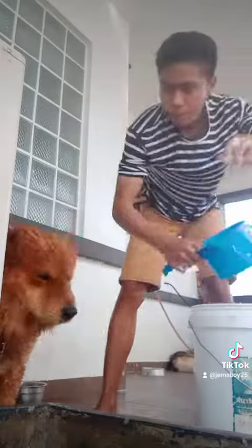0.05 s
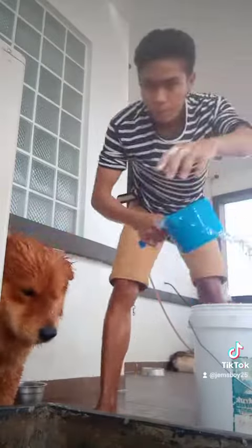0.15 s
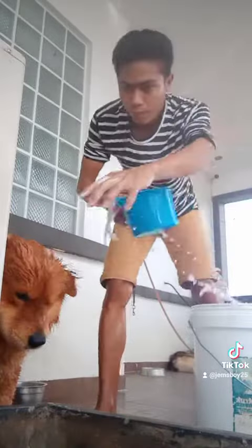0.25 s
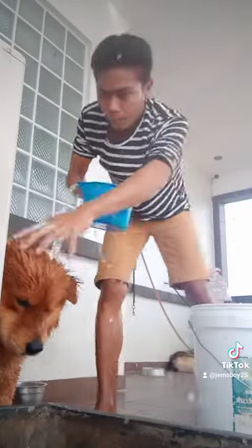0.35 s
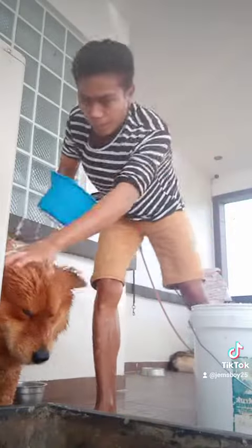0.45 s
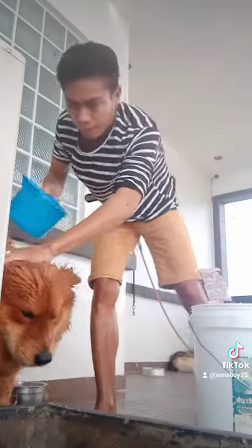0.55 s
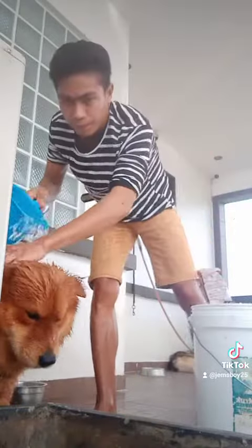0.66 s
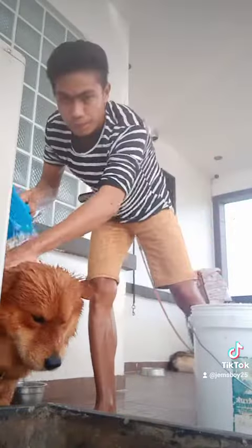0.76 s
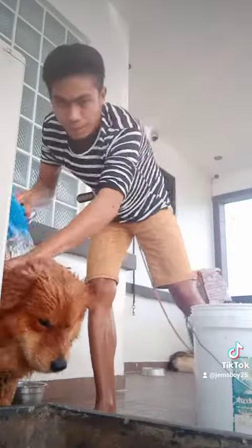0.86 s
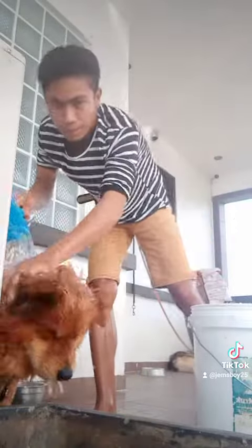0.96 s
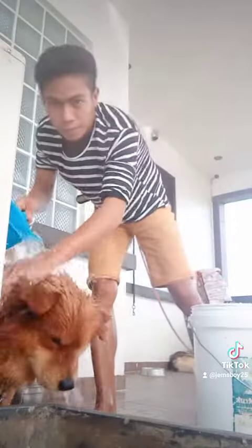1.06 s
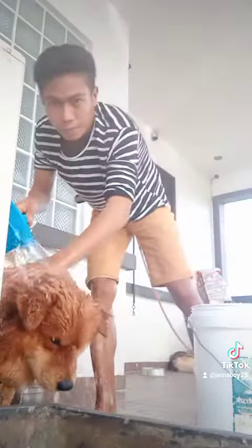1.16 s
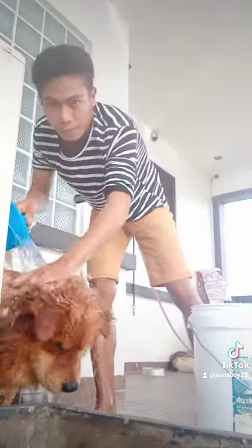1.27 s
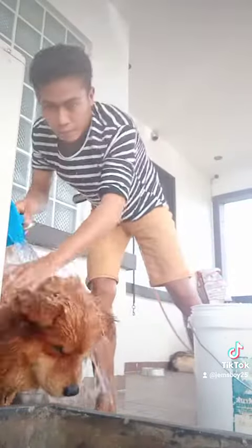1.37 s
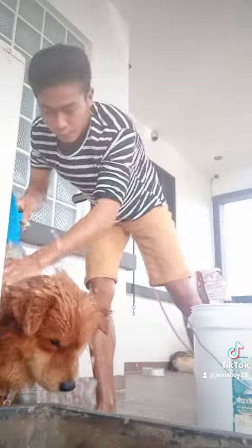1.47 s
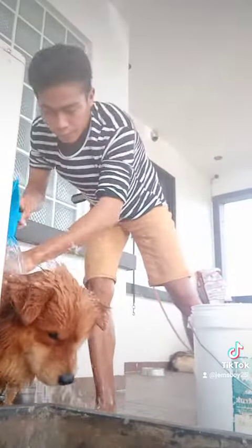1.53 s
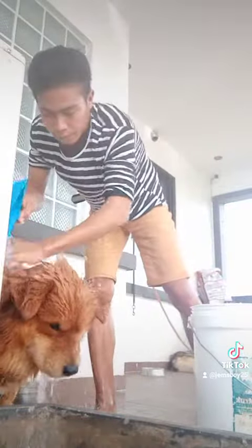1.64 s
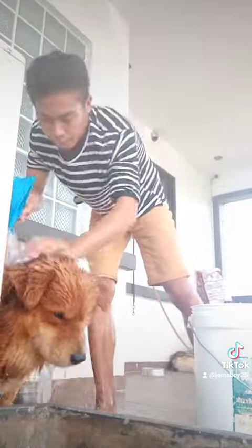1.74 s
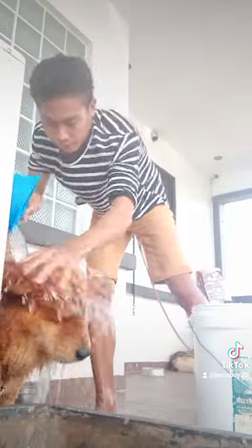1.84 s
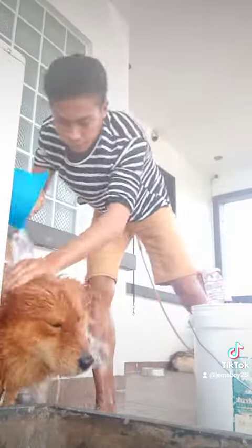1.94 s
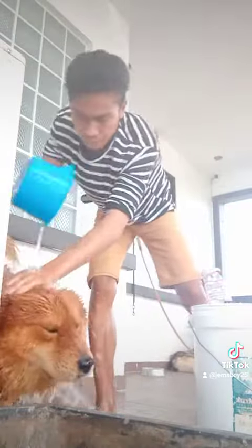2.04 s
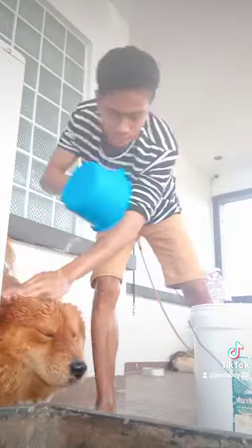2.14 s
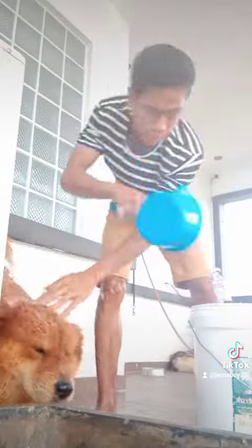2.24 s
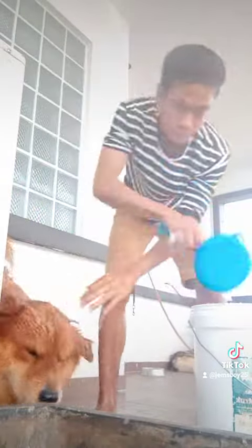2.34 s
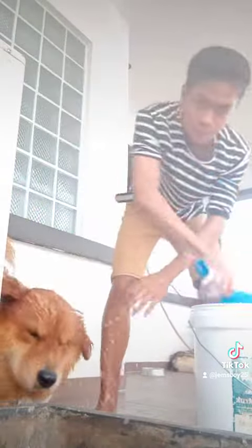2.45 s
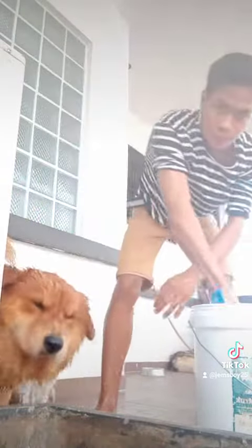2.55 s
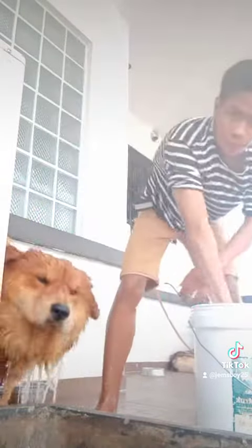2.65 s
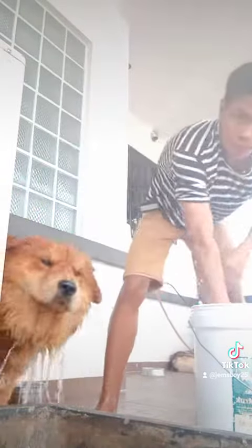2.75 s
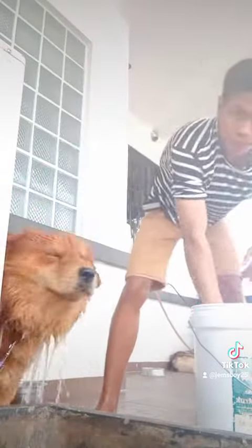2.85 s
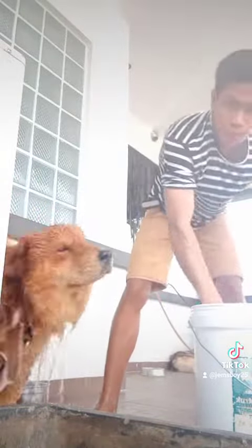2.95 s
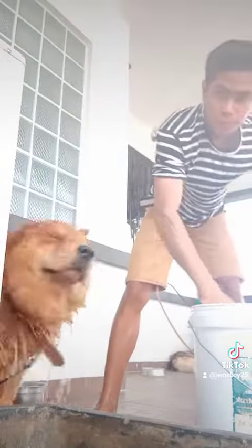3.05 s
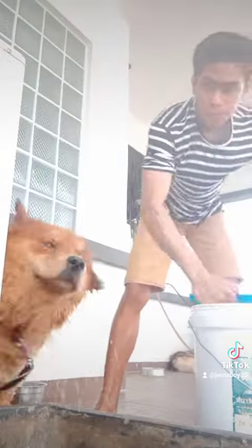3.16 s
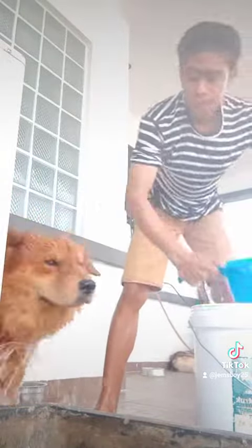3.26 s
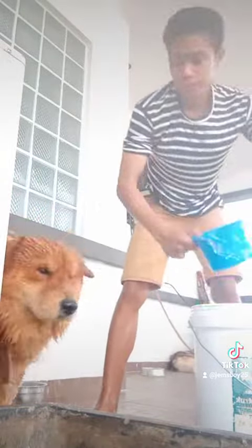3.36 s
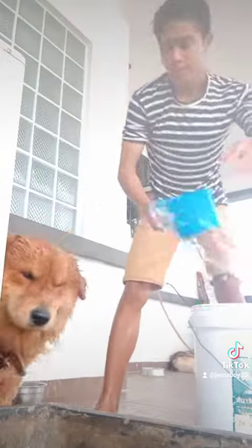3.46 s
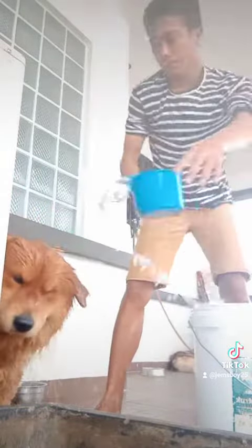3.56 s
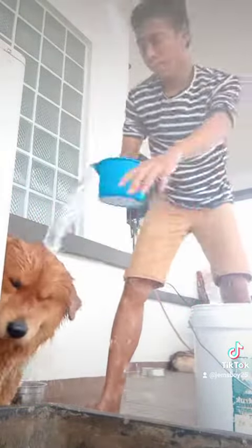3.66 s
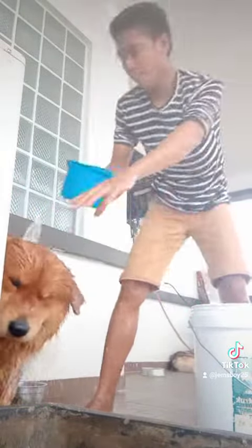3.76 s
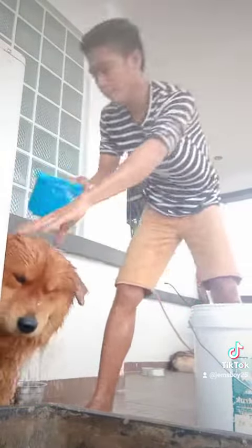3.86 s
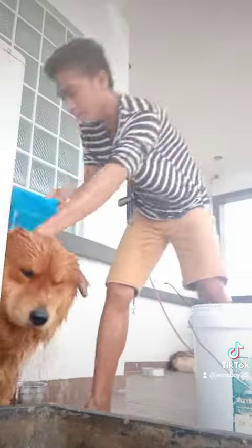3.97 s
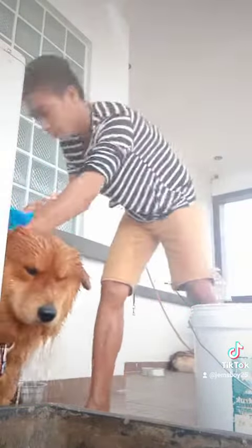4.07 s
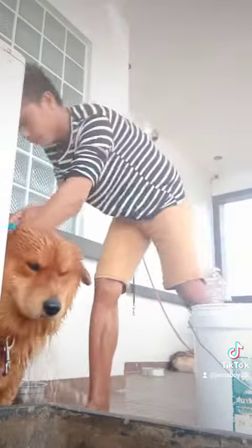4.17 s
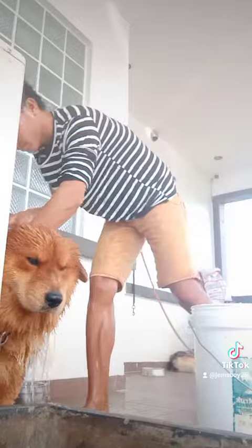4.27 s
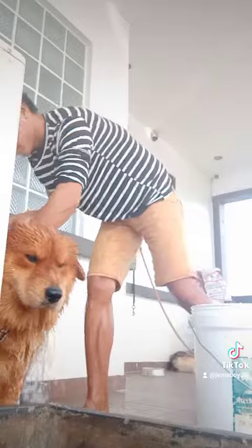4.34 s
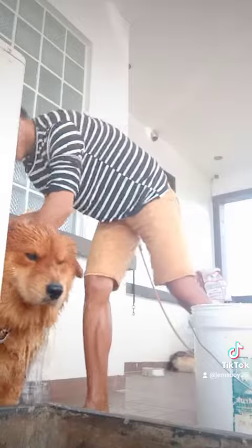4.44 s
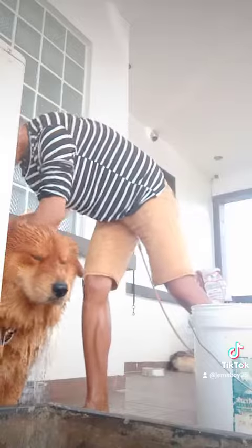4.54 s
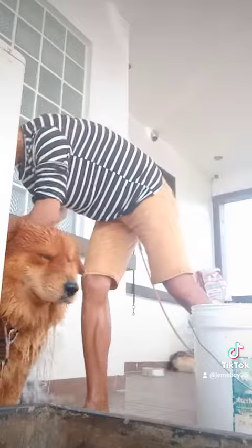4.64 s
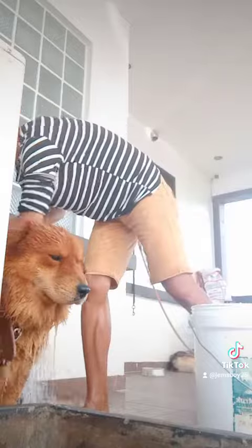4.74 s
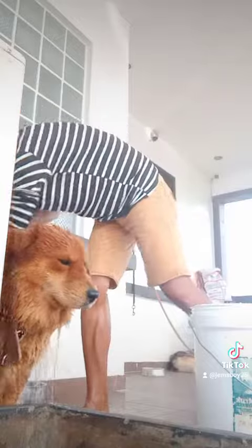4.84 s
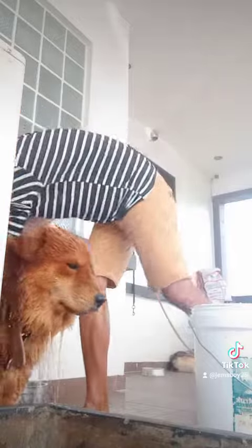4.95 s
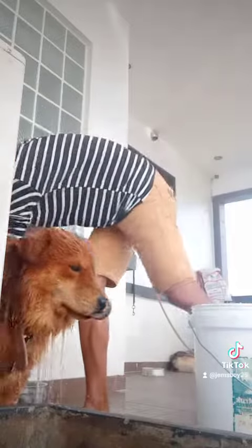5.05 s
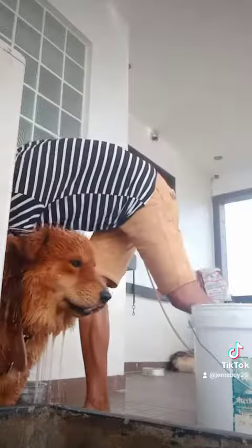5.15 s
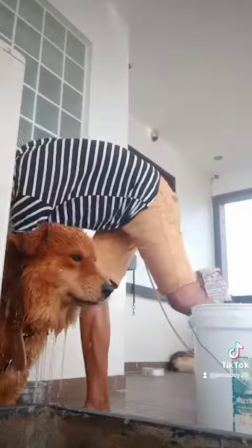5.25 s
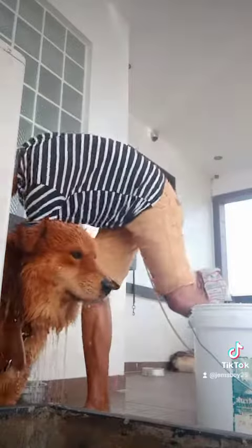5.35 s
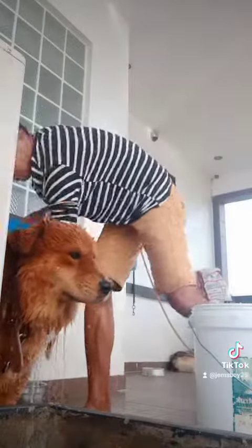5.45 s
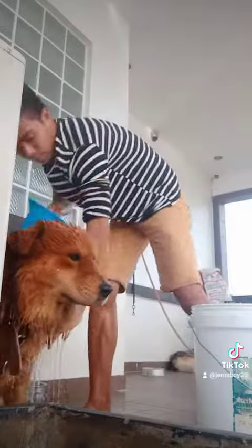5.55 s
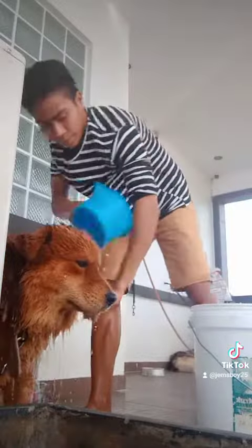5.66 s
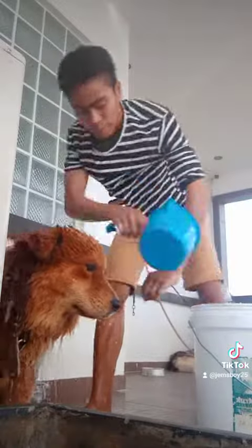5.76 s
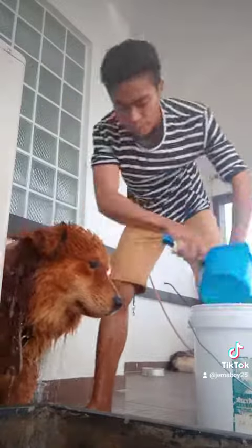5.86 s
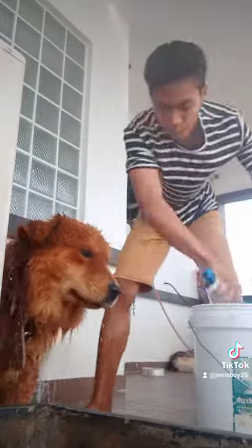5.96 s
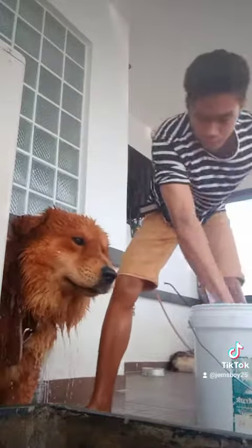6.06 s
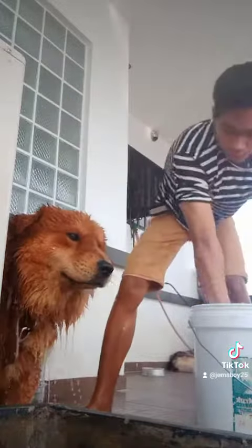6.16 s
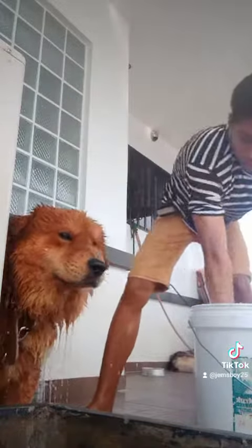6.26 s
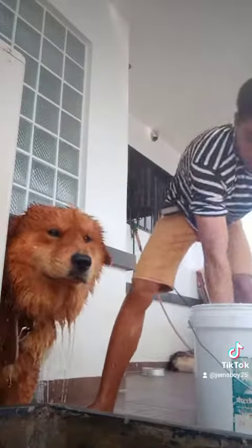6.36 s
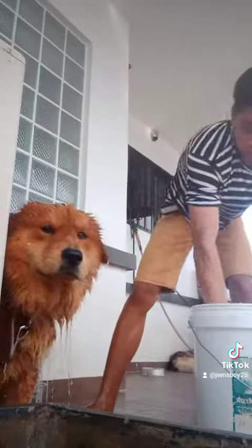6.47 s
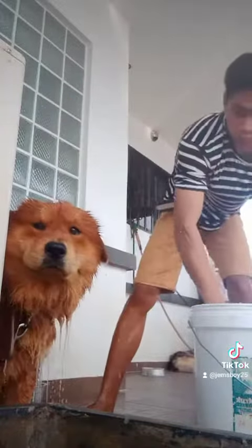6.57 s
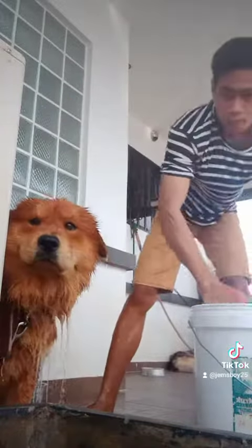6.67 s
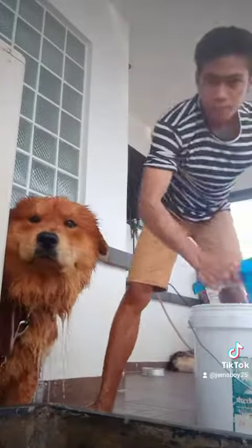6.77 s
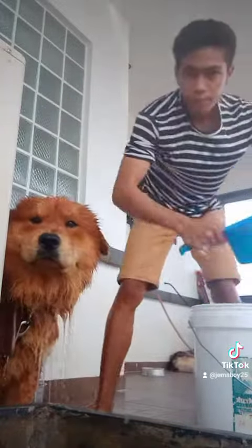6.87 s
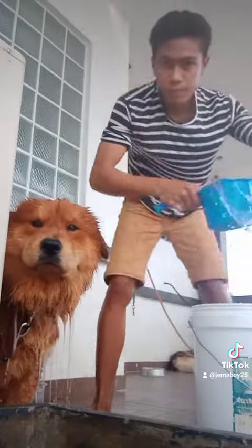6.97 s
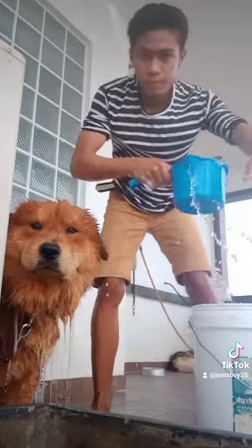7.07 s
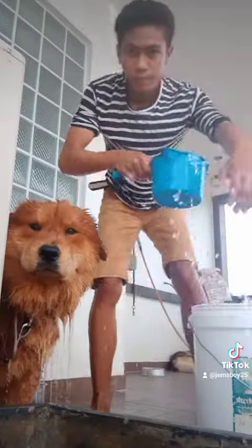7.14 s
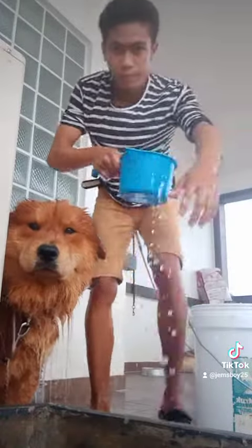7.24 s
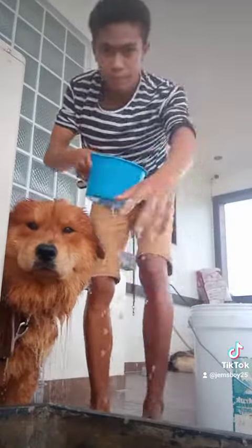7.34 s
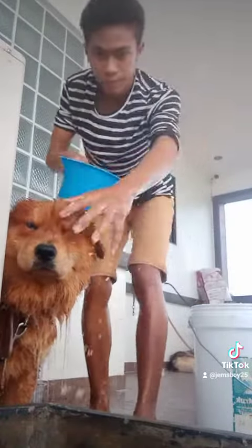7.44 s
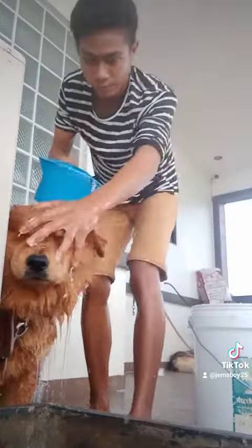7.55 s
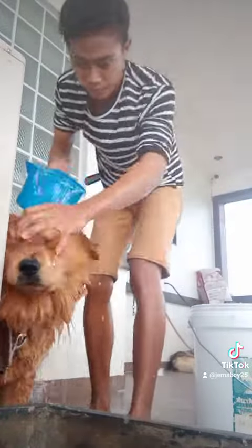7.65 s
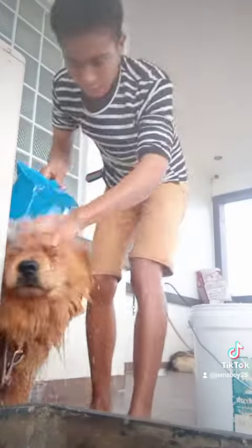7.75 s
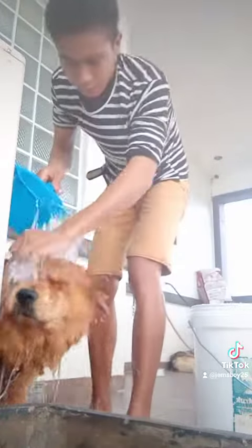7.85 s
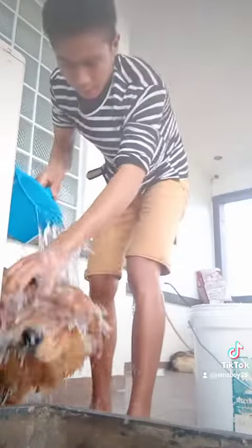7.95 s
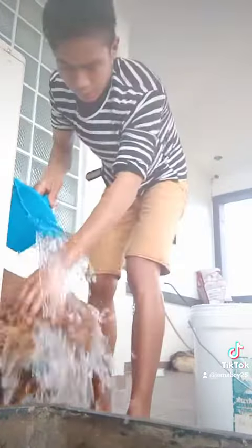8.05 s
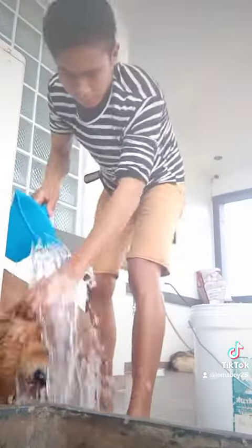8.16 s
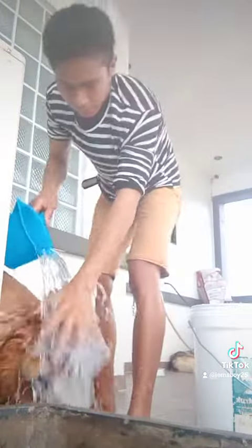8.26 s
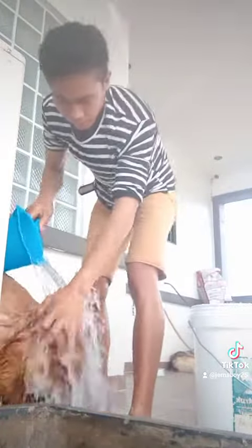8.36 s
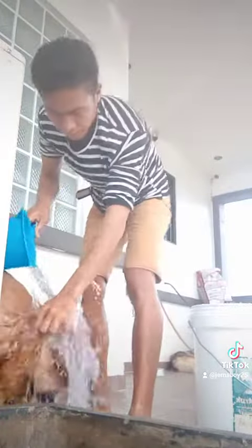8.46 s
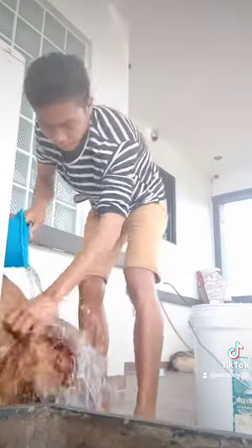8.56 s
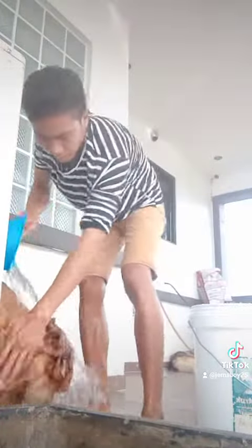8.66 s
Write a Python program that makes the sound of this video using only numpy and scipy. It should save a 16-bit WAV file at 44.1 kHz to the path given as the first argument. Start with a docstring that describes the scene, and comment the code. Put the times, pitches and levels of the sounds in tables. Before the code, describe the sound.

A brief gurgling splash and wet slaps on tiles open, then lighter pours over a dog with several dull low thumps. A scoop knocks and gulps in a plastic bucket, more water splashes and drips, a quieter lull follows, then a second dip and a final bright splash. Low rumble underneath; close, muffled, boxy phone microphone on a hard porch floor.

```python
"""Water gurgles and splashes first, poured over a dog on a tiled porch, with drops and blobs slapping the tiles.
Dull thumps and one faint low hum follow; a scoop gulps, rings and knocks in a plastic bucket, over a low rumble.
Pouring is made of many tiny dying tones, landing drops of filtered noise bursts, gulps and high rings of single
gliding tones, and knocks and thumps of struck or noise-driven resonances. A phone on the ground colours it all.
"""
import sys
import numpy as np
from scipy import signal
from scipy.fft import rfft
from scipy.io import wavfile
from scipy.ndimage import uniform_filter1d

SR = 44100
rng = np.random.default_rng(int(sys.argv[2]) if len(sys.argv) > 2 else 0)


def transcribe(signal):
    """Save signal, clipped to [-1, 1], as a 16-bit WAV file at the path in sys.argv[1]."""
    frames = np.atleast_2d(signal).T
    limited = np.clip(frames, -1, 1)
    pcm = np.round(limited * 32767).astype(np.int16)
    wavfile.write(sys.argv[1], SR, pcm)


N = 384111  # length in samples


def amp(db):
    """Turns decibels into gain."""
    return 10 ** (np.asarray(db) / 20)


def read(points, hz):
    """Reads the value of a frequency table at the frequencies hz."""
    f, value = np.transpose(points)
    return np.interp(np.log(hz + 1), np.log(f + 1), value)


def curve(rows):
    """Reads the columns of a time table at every sample."""
    s, *columns = np.transpose(rows)
    return [np.interp(np.arange(N) / SR, s, column) for column in columns]


def port_db(hz):
    """Colour of the microphone opening plus the resonances of the corner where the phone stands."""
    # microphone opening and the ledge beside it: pitch_hz, gain_db
    opening = [(20, -38), (45, -27), (100, -18), (470, -2), (640, -15), (800, -1.5), (1310, -6.5),
               (1400, -18), (1600, -13), (1900, -3), (2400, -8.5), (4200, -9), (6000, -19.5), (6550, -36.5),
               (7000, -36), (8300, -45.5), (13600, -50), (14900, -27.5)]
    # narrow resonances of the corner: pitch_hz, width_hz, gain_db
    corner = [(802, 88, -2.5), (950, 230, 1.5), (1070, 18, 3), (1260, 31, 7), (1840, 107, 4.5),
              (2690, 124, 5)]
    bumps_db = sum(db / (1 + (2 * (hz - f) / width) ** 2) for f, width, db in corner)
    return read(opening, hz) + bumps_db


def port():
    """Impulse response with this colour and the shortest possible delay (minimum phase)."""
    hz = abs(np.fft.fftfreq(8192, 1 / SR))
    log_gain = np.log(amp(port_db(hz)))
    phase = signal.hilbert(log_gain).imag
    return np.fft.ifft(np.exp(log_gain - 1j * phase)).real[:4096]


def unit(x, lo, hi):
    """Scales x so that its part between lo and hi Hz has rms 1 as heard through the port."""
    hz = np.fft.rfftfreq(len(x), 1 / SR)
    heard = abs(rfft(x) * amp(port_db(hz)))[(hz > lo) & (hz < hi)]
    return x * len(x) / np.sqrt(2 * np.sum(heard ** 2) + 1e-20)


def add(mix, s, sound, db):
    """Places a sound at s seconds, its early peak at db as heard through the port."""
    part = mix[round(s * SR):][:len(sound)]
    peak = abs(signal.fftconvolve(sound[:4000], port())).max()
    part += (amp(db) * sound / peak)[:len(part)]


def resonate(x, hz, width):
    """Shifts hz down to zero, smooths, shifts back: a resonance of gain 1."""
    turn = np.exp(2j * np.pi * np.cumsum(hz * np.ones(len(x))) / SR)
    r = np.exp(-np.pi * width / SR)
    smooth = signal.lfilter([1 - r], [1, -r], x / turn)
    return 2 * (turn * smooth).real


def grains(lo_hz, hi_hz, cycles, glide, per_s, spread_db, count):
    """Many short bubbles, each a dying tone that rises in pitch; a few differ strongly in loudness."""
    happens = rng.random(N) < per_s / SR
    # positive spread makes a few bubbles stand out, negative spread makes a few very quiet
    size = amp(spread_db * np.minimum(rng.exponential(1, N), 5)) * happens
    kind, out = rng.integers(0, count, N), np.zeros(N)
    for k, hz in enumerate(np.geomspace(lo_hz, hi_hz, count)):
        turns = np.arange(int(SR * 4 * cycles / hz)) * hz / SR
        shape = (1 - np.exp(-3 * turns)) * np.exp(-turns / cycles)
        tone = shape * np.sin(2 * np.pi * turns * (1 + glide * turns / cycles))
        out += signal.oaconvolve(size * (kind == k), tone / np.linalg.norm(tone))[:N]
    return out


def clumps(width_s, per_s, depth):
    """Water lands unevenly: a steady share plus sudden swells of random size that fade."""
    swells = rng.exponential(1, N) * (rng.random(N) < per_s / SR)
    fade = np.exp(-np.arange(SR // 8) / SR / width_s)
    return 1 + depth * signal.oaconvolve(swells, fade)[:N]


def porch(x, wet_db):
    """Adds dense reflections of random sign, one about every 20 samples from 4.5 ms on, each band dying at its
    own speed."""
    # time for the echo to fall by 60 dB: pitch_hz, decay_s
    echo_decay = [(150, 0.42), (500, 0.2), (1500, 0.41), (4000, 0.22), (10000, 0.31)]
    taps = np.zeros(SR // 2)
    at = np.arange(200, SR // 2 - 20, 20)
    taps[at + rng.integers(0, 20, len(at))] = rng.choice([-1., 1.], len(at))
    hz, t, z = signal.stft(taps, SR, nperseg=256)
    fade = amp(-60 * t / read(echo_decay, hz)[:, None])
    tail = signal.istft(z * fade, SR, nperseg=256)[1]
    return x + amp(wet_db) * signal.oaconvolve(x, tail / np.linalg.norm(tail))[:N]


def sheets():
    """Gains of spray, gurgle and fizz: each sheet lands quickly, swells or sags, then fades into the trickle."""
    # falling or sloshing water: start_s, length_s, spray on the tiles level_db,
    # gurgle of larger drops level_db, fine fizz level_db, change_db while it lasts
    falls = [(0, 0.12, -46, -34, -74, -12), (0.185, .18, -57, -51.5, -63.5, 13),
             (0.503, 0.098, -69, -34.5, -85.5, -10.5), (0.646, 0.28, -71, -55.5, -96, -1),
             (0.964, 0.077, -56, -50, -79.5, 14), (1.05, 0.26, -53, -43, -67.5, -0.5),
             (1.284, 0.47, -52, -49, -66.5, 2.5), (1.8, .07, -62, -67, -77, -2),
             (1.873, .1, -57, -75, -61.5, -3.5), (2.011, 0.22, -75, -57, -63, -2),
             (2.235, 0.3, -72, -61, -81, 2), (2.466, 0.12, -50, -53, -78.5, 7),
             (2.697, 0.073, -44.5, -39, -67.5, 3.5), (2.797, 0.56, -45.5, -36, -75, -5.5),
             (2.938, 0.059, -41.5, -34.5, -74, -3), (3.423, 0.21, -67, -42.5, -53, -20.5),
             (3.575, 0.24, -48.5, -40.5, -57.5, -8.5), (3.82, 0.1, -61, -64, -71.5, -5.5),
             (3.954, 0.26, -52.5, -49, -73, -2), (4.242, 0.15, -67, -59, -70.5, 11),
             (4.406, 0.34, -47, -47.5, -65.5, 0), (4.757, 0.19, -43.5, -44.5, -65.5, -5),
             (4.97, 0.16, -55.5, -49, -67, -2.5), (5.166, 0.16, -77, -58.5, -77, -2.5),
             (6.002, 0.078, -44, -28, -72, -8.5), (6.219, 0.026, -34, -35, -65, -5),
             (6.316, 0.015, -40.5, -36.5, -66.5, -1), (6.355, 0.26, -50, -38.5, -80, 4),
             (6.46, 0.038, -43.5, -36, -70, 0), (6.677, 0.24, -49.5, -41.5, -81, -7.5),
             (6.987, .04, -64, -55, -67, 5), (7.025, 0.2, -45.5, -49, -61, 7),
             (7.242, 0.1, -68, -60, -72.5, 0), (7.357, 0.13, -65, -57, -73.5, 4.5),
             (7.677, .12, -62, -59.5, -80, 7.5), (7.798, 0.17, -49, -46.5, -76.5, 3.5),
             (7.968, .02, -58, -55, -61, -1), (8.012, 0.091, -60, -61, -55.5, -8.5),
             (8.103, 0.19, -38, -44, -56, -4), (8.295, 0.13, -38, -35.5, -57.5, -1),
             (8.422, 0.28, -48, -49, -63.5, -2)]
    rise_s, fade_db_per_s = 0.02, (-230, -170, -330)  # fades: spray, gurgle, fizz
    trickle_db = (-76, -60, -87.5)  # water running off the coat: spray, gurgle, fizz
    t = np.arange(N) / SR
    power = amp(trickle_db)[:, None] ** 2
    for s, length, *levels_db, change_db in falls:
        rise = np.clip((t - s) / rise_s, 0, 1)
        drift_db = change_db * np.clip((t - s) / length, 0, 1)
        fade_db = np.outer(fade_db_per_s, np.maximum(t - s - length, 0))
        power = power + (rise * amp(np.c_[levels_db] + drift_db + fade_db)) ** 2
    return np.sqrt(power)


def water():
    """Streams of different drop sizes land in clumps, partly together and partly each on its own."""
    spray_gain, gurgle_gain, fizz_gain = sheets()
    shared = clumps(width_s=.004, per_s=40, depth=.9) * clumps(width_s=.04, per_s=8, depth=.4)
    spray = np.zeros(N)
    for hz in np.geomspace(1600, 5900, 6):
        drops = grains(hz, hz * 1.288, cycles=1.87, glide=0.02, per_s=820, spread_db=-4.0, count=4)
        own = clumps(width_s=0.022, per_s=25, depth=1.2)
        spray += drops * own * amp(0.41 * np.log2(hz / 3000))
    spray *= shared
    plinks = grains(1600, 6000, cycles=11, glide=.01, per_s=300, spread_db=4.5, count=30)
    gurgle = grains(597.5, 1608, cycles=6.5, glide=0.015, per_s=600, spread_db=3.0, count=16)
    gurgle *= shared ** .5
    fizz = grains(6420, 13400, cycles=1.05, glide=0.031, per_s=12000, spread_db=2.0, count=8)
    fizz *= shared ** .5 * clumps(width_s=0.011, per_s=15, depth=1.0)
    tiles = unit(spray, 1600, 6300) + amp(-2.5) * unit(plinks, 1600, 6300)
    return (spray_gain * unit(porch(tiles, -8.5), 1100, 6300)
            + gurgle_gain * unit(porch(gurgle, -4.0), 490, 1400)
            + fizz_gain * unit(porch(fizz, -18.0), 9200, 16600))


def rumble_and_hiss():
    """Low rumble and faint hiss: noise with a shaped spectrum, in drifting patches."""
    # low rumble that swells while the scoop works in the bucket: time_s, level_db
    rumble = [(0.0, -50), (2.13, -60), (2.71, -46), (3.13, -48), (3.52, -56.5), (5.14, -58), (6.06, -55),
              (6.45, -46.5), (6.86, -54), (8.71, -54.5)]
    # balance of the noise before it is scaled: pitch_hz, relative level_db (per Hz)
    colour = [(25, -27), (50, 12), (95, 18), (140, 2.5), (300, -11), (600, -13), (1300, -63), (3000, -73),
              (8000, -51), (16000, -43)]
    frames, hz = N // 512 + 5, np.fft.rfftfreq(2048, 1 / SR)
    a, b, patches = rng.standard_normal((frames, 1025, 3)).T
    patches = uniform_filter1d(uniform_filter1d(patches, 6, 0), 8, 1)  # smooth over pitch, then time
    z = (a + 1j * b) * amp(read(colour, hz)[:, None] + 2.5 * patches / patches.std())
    noise = signal.istft(z, nperseg=2048, noverlap=1536)[1][:N]
    return amp(curve(rumble)[0]) * unit(noise, 39, 240)


def splats(rows, t60, share, smack, hiss, wet_db):
    """A smack, then a short noise spatter around the pitch of the drop or blob."""
    out, t = np.zeros(N), np.arange(SR // 5) / SR
    for (s, db, hz), noise in zip(rows, rng.standard_normal((len(rows), len(t)))):
        drive = noise * (amp(-60 * t / t60) + smack * np.exp(-t / 0.00069))
        width = hz * share
        body = resonate(resonate(drive, hz, width), hz, width)
        treble = np.diff(drive, prepend=0)
        add(out, s, body + hiss * treble, db)
    return porch(out, wet_db)


def thumps_and_hum():
    """Dull thumps and one faint low hum: noise swells and dies in low resonances, the bass last."""
    # dull thumps, and one faint low hum at 4.191 s:
    # start_s, peak level_db, tilt_db per octave, decay_s (60 dB fall at 400 Hz)
    hits = [(0.499, -14, -4, 0.45), (1.044, -16, -3, 0.48), (1.549, -16.5, -3, 0.47),
            (2.029, -41.5, -11, 0.2), (2.367, -28, -4.5, 0.5), (3.831, -30.5, -6.5, 0.38),
            (4.191, -40.5, -19, .4), (5.813, -42, -4, 0.19), (7.438, -43, 1, 0.13),
            (7.548, -34.5, -5.5, .21), (8.315, -35, 2, 0.13)]
    # resonances, each applied twice in a row: pitch_hz, width_hz (of one pass), level_db
    hollow = [(121.5, 31, 8.5), (188, 22, 1.5), (257, 11, -3.5), (288.5, 61, 0), (410, 42, -4),
              (653, 133, 0.5), (749, 200, -8.5), (820, 27, -1), (1050, 160, -4), (2005, 200, -21),
              (2800, 410, -24.5)]
    rise_s = 0.0085
    out, t = np.zeros(N), np.arange(SR * 2 // 3) / SR
    for (s, db, tilt, t60), noise in zip(hits, rng.standard_normal((len(hits), len(t)))):
        drive = noise * (1 - np.exp(-(t / rise_s) ** 2))
        body = np.zeros(len(t))
        for hz, width, level in hollow:
            fade_db = -60 * t / t60 * (hz / 400) ** 0.08
            ringing = resonate(resonate(drive, hz, width), hz, width)
            body += amp(level + tilt * np.log2(hz / 400) + fade_db) * ringing
        add(out, s, body, db)
    return out


def gulps_and_rings():
    """Gulping air pockets and two high rings, probably of the scoop: dying, gliding tones that shake."""
    # gulps, and two high rings near 2000 Hz: start_s, peak level_db, pitch_hz,
    # rise of pitch as a share per s (negative falls), decay_s (60 dB)
    tones = [(1.898, -52, 430, 1.2, 0.17), (2.035, -37.5, 430, 1, 0.089), (2.684, -12, 345.5, 6.5, 0.15),
             (2.69, -31.5, 1956, 0.9, 0.41), (2.718, -16, 325, -1.5, 0.055), (2.956, -31, 450, 6, 0.31),
             (3.065, -31, 236, -1, 0.26), (3.2, -13.5, 769, -0.5, 0.15), (3.29, -28, 500, 7, 0.25),
             (4.794, -24, 455, 19, 0.0077), (6.224, -16.5, 175.4, -4, 0.18), (6.233, -25, 2063, 0.3, 0.092),
             (6.242, -23, 329.7, 3, 0.5), (6.296, -15, 227, 4, 0.042), (6.33, -24, 950, -4.5, 0.11),
             (6.362, -20, 292, 0.2, 0.42), (6.47, -23, 390, 5.5, 0.38), (6.6, -30, 226.5, 1.2, 0.37),
             (6.909, -28.5, 271, -0.5, 0.16), (6.962, -36, 279, 2, 0.16)]
    out, t = np.zeros(N), np.arange(SR // 2) / SR
    for (s, db, hz, rise, t60), noise in zip(tones, rng.standard_normal((len(tones), 2, len(t)))):
        waver, shake = uniform_filter1d(noise, 300, axis=1) * np.sqrt(300)
        pitch = hz * (1 + rise * np.minimum(t, t60)) + .55 * np.sqrt(hz) * waver
        shape = (1 - np.exp(-t * hz)) * amp(3.4 * shake - 60 * t / t60)
        add(out, s, shape * np.sin(2 * np.pi * np.cumsum(pitch) / SR), db)
    return porch(out, -5.0)


def knocks():
    """A soft blow and a longer wet rattle ring the plastic wall, each knock at slightly, randomly shifted pitches."""
    # scoop against bucket: start_s, peak level_db, tilt_db per octave, ring (factor on decay, at least 0.1)
    hits = [(2.539, -13.5, 1, 0.21), (2.683, -12.5, -10, 0.47), (2.719, -12.5, -9.5, 0.42),
            (3.062, -15, -2.5, 0.48), (3.191, -18.5, 6.5, 0.09), (3.2, -8.5, -2, 0.82),
            (6.012, -10.5, 0, 0.16), (6.226, -12.5, -14, 0.13), (6.296, -28, 2, .45),
            (6.386, -19.5, -1.5, 1), (6.462, -18, -3, 0.6), (6.601, -26.5, 3, 0.26), (6.667, -22, -5.5, .3),
            (6.838, -29.5, -0.5, 0.34), (6.908, -27, -.5, 0.23), (6.957, -23.5, -10, 0.24)]
    # ringing modes of the wall: pitch_hz, level_db, decay_s (60 dB, before the ring factor)
    modes = [(106.3, -18, 0.98), (172, -30, 0.05), (256.3, 5, 0.078), (338, -5.5, 0.19),
             (430, -14.5, 0.027), (584, 13, 0.032), (680, 0, 0.2), (777, -1, 0.38), (950, 8, 0.048),
             (1150, -0.5, 0.18), (1230, 4.5, 0.039), (1980, -12.5, 0.23), (2790, -24.5, 0.29),
             (3400, -5.5, 0.051), (4500, -20, 0.069)]
    rattle_s, blow = 0.02, 0.51  # fading time of the rattle, strength of the blow
    out, t = np.zeros(N), np.arange(SR // 2) / SR
    rattle_t = t[:6000]
    rattle_shape = (1 - np.exp(-rattle_t / 0.0029)) * np.exp(-rattle_t / rattle_s)
    chance = rng.standard_normal((len(hits), 6000 + len(modes)))
    for (s, db, tilt, ring), noise in zip(hits, chance):
        drive = 0.32 * noise[:6000] * rattle_shape
        drive[:16] += blow * np.hanning(16)
        wall = np.zeros(len(t))
        for (hz, level, t60), shift in zip(modes, noise[6000:]):
            strength = amp(level + tilt * np.log2(hz / 600) - 60 * t / (t60 * max(ring, .1)))
            wall += strength * np.sin(2 * np.pi * hz * (1 + 0.031 * shift) * t)
        wall[:6] += 1.5  # the dull, wide crack of the contact itself
        add(out, s, signal.oaconvolve(wall, drive), db)
    return porch(out, -10.5)


def dips():
    """Large bubbles burst from the scoop and shake the pocket of air that it traps."""
    # the scoop under water, one list a dip: time_s, level_db, trapped air pitch_hz
    scoops = [
        [(2.67, -47, 341), (2.82, -36, 358), (3, -31.5, 430), (3.13, -43, 267), (3.2, -41, 374),
         (3.35, -39, 462), (3.5, -53, 268)],
        [(6.21, -52, 330), (6.28, -29.5, 298), (6.39, -34, 308), (6.5, -38.5, 397), (6.6, -54, 249),
         (6.66, -46, 230), (6.83, -68, 303), (6.9, -42.5, 267), (7.06, -62, 327)],
    ]
    burble = grains(131.5, 726, cycles=3.9, glide=0.023, per_s=240, spread_db=2.0, count=16)
    burble = porch(burble, -1.6)
    t, out = np.arange(N) / SR, np.zeros(N)
    for rows in scoops:
        level_db, hz = curve(rows)
        pocket = burble + 0.45 * resonate(burble, hz, 30)
        inside = (t > rows[0][0]) & (t < rows[-1][0])
        soft_edges = uniform_filter1d(inside * 1., 600)
        out += amp(level_db) * unit(pocket, 110, 650) * soft_edges
    return out


def scene():
    """Adds all sources into one channel; each landing blob also throws up bright spatter."""
    # blobs of water landing: start_s, peak level_db, centre pitch_hz, bright spatter peak level_db
    slaps = [(0.205, -33, 850, -35), (.264, -17.5, 1210, -35), (0.311, -22.5, 1260, -27),
             (0.342, -28, 1100, -45), (0.356, -18, 1150, -24.5), (0.368, -21, 1300, -33),
             (.972, -34.5, 1090, -54), (1.729, -23.5, 1640, -34.5), (1.94, -35, 1920, -48),
             (2.044, -30.5, 1980, -47), (2.12, -37, 815, -38), (2.508, -39, 820, -44.5),
             (3.3, -47, 802, -40), (3.434, -36.5, 1090, -43), (3.611, -16.5, 1050, -19),
             (3.957, -33.5, 1070, -51), (4.175, -34, 1860, -50), (4.411, -28, 1070, -41),
             (4.476, -27.5, 2200, -29), (4.799, -33.5, 900, -37), (5.44, -38, 795, -68),
             (7.037, -21.5, 1150, -23), (7.209, -18, 1260, -22), (7.428, -19.5, 1840, -34),
             (7.863, -28.5, 910, -54), (7.919, -27, 1090, -54), (7.952, -33, 1110, -54),
             (7.98, -32, 1110, -34), (8.016, -49, 1880, -56), (8.081, -30.5, 1890, -42),
             (8.116, -27.5, 1270, -25), (8.125, -18.5, 2690, -53), (8.138, -26.5, 2860, -44),
             (8.198, -23, 1980, -40)]
    # single small drops: start_s, peak level_db, centre pitch_hz
    drips = [(.059, -47, 2600), (.247, -34, 2950), (.514, -39.5, 2370), (.701, -54, 2300),
             (.932, -50, 2790), (1.213, -34, 3720), (1.245, -34, 3430), (1.299, -44, 4290),
             (1.327, -45, 3000), (1.356, -36, 5330), (1.457, -45, 3600), (1.526, -36, 2920),
             (1.892, -36.5, 4140), (2.159, -34.5, 2650), (2.265, -39, 3760), (2.539, -31, 2640),
             (2.795, -41, 4330), (3.196, -32, 2420), (3.495, -28.5, 3000), (3.783, -33, 3540),
             (4.017, -35.5, 3800), (4.253, -36, 3970), (4.276, -34, 3150), (4.337, -31, 3400),
             (4.364, -29, 3050), (4.548, -29, 3060), (4.582, -32, 3430), (4.645, -28, 3080),
             (4.749, -30, 3660), (4.928, -39, 3200), (5.005, -38, 4170), (5.067, -33.5, 3420),
             (5.14, -33.5, 3970), (5.284, -44, 3370), (5.309, -50, 2920), (5.505, -56, 5900),
             (5.574, -44.5, 4470), (5.662, -45, 2550), (5.677, -54, 2800), (5.796, -68, 4500),
             (5.96, -61, 3200), (6.13, -43.5, 3220), (6.396, -40, 2700), (6.751, -33, 3220),
             (6.991, -43, 3700), (7.331, -43, 2640), (7.386, -38, 3640), (7.481, -45, 3000),
             (7.753, -44, 2650), (7.822, -34, 2440), (7.878, -31.5, 4100), (8.052, -47, 4260),
             (8.555, -52, 3410), (8.613, -39, 4430)]
    # t60 in s; share is the width of each resonance pass as a share of the centre pitch
    blobs = splats([row[:3] for row in slaps], t60=0.084, share=0.71, smack=4.0, hiss=0.2, wet_db=-12.5)
    spatter_hz = 3240
    spatter = [(s, db, spatter_hz) for s, _, _, db in slaps]
    drops = splats(drips + spatter, t60=0.052, share=0.42, smack=0.98, hiss=.04, wet_db=-1.0)
    bucket = dips() + gulps_and_rings() + knocks()
    return (water() + blobs + drops + bucket + thumps_and_hum() + rumble_and_hiss())[None]


def record(dry):
    """The port colours everything, the microphone adds faint hiss; then the top treble is cut."""
    hiss_db, edge_hz = -82.5, 15650
    heard = signal.oaconvolve(dry, port()[None])[:, :N] + amp(hiss_db) * rng.standard_normal(N)
    low_pass = signal.firwin(1023, edge_hz, window=("kaiser", 10), fs=SR)
    return signal.oaconvolve(heard, low_pass[None], "same")


dry = scene()
out = record(dry)
transcribe(out)
```